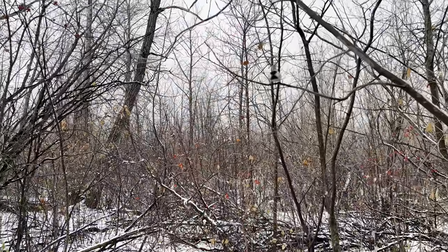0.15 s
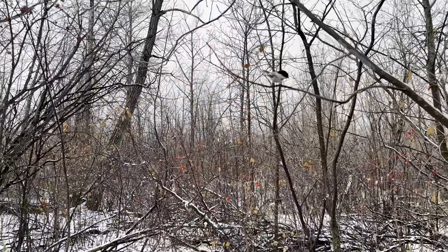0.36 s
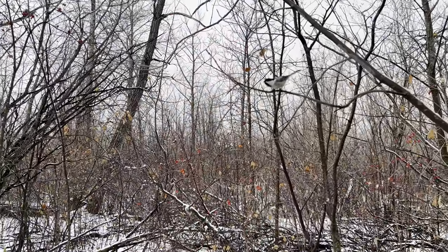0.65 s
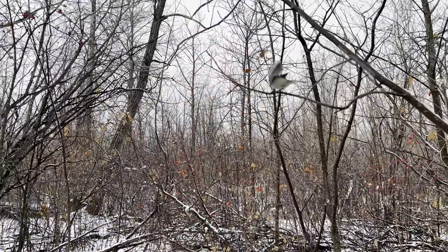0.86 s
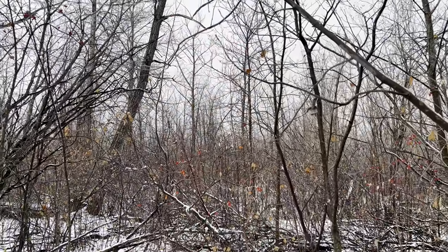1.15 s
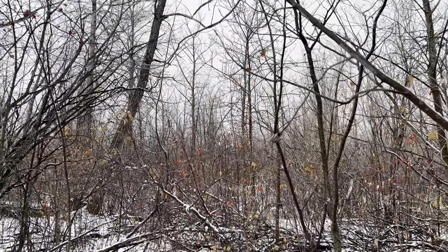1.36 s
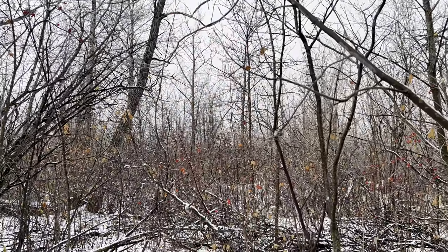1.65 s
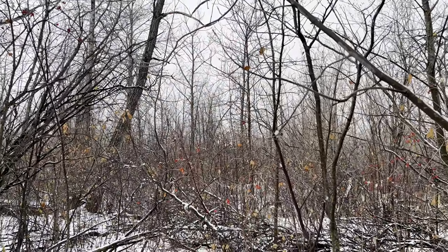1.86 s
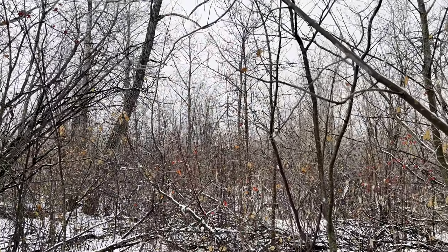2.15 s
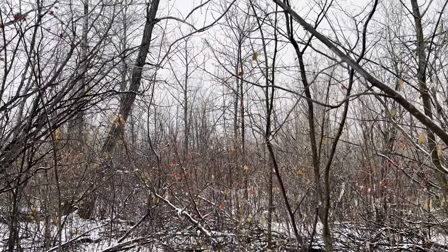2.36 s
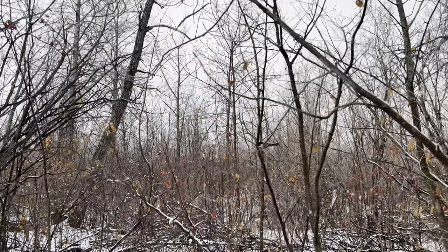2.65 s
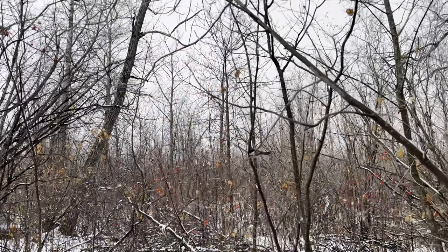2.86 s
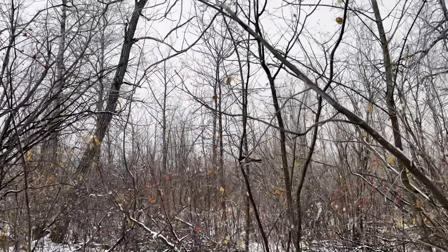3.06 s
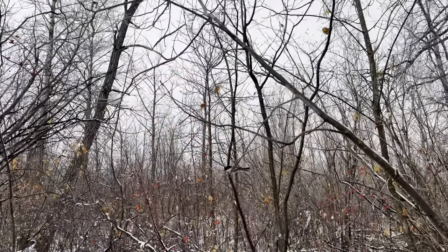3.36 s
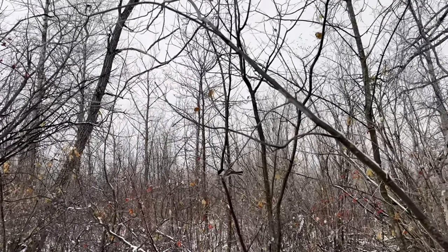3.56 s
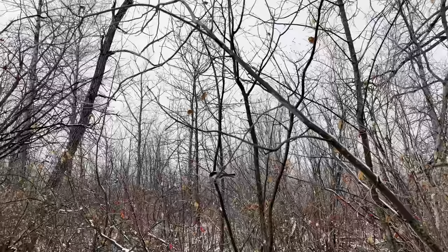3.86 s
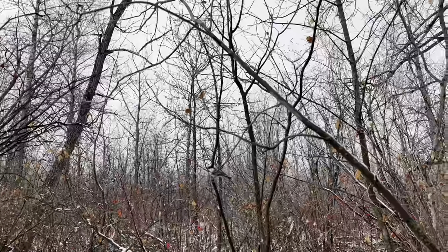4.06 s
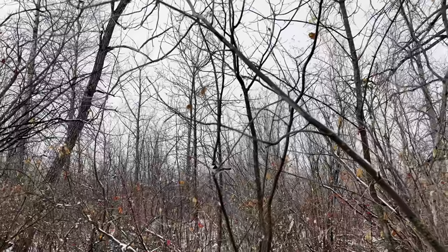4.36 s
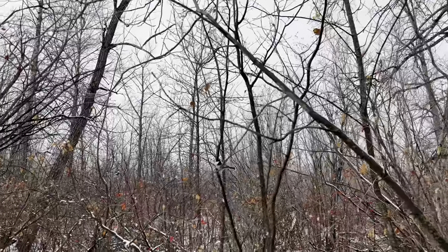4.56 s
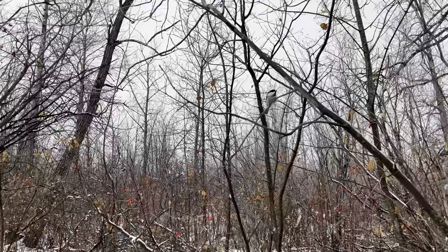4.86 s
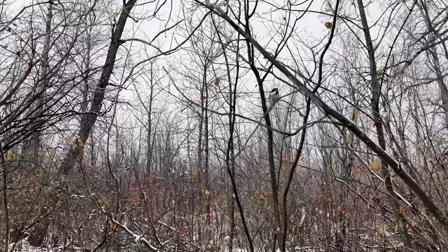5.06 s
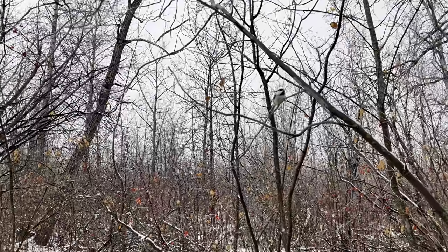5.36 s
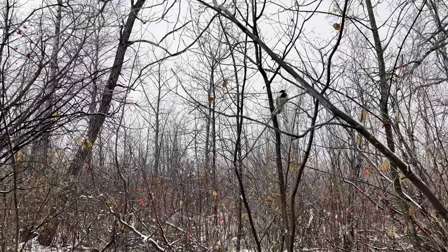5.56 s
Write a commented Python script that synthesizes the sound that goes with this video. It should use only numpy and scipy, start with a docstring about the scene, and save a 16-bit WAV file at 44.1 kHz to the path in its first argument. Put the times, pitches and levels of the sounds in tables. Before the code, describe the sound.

A chickadee whistles two clear notes, then gives two buzzy chick-a-dee calls with wing flutters in a quiet, snowy wood.

```python
"""A snowy wood with chickadees, heard by a hand-held camera with two microphone ports. One bird whistles two
clear notes, each a nearly pure tone from a single membrane. Two chick-a-dee calls follow, made by two membranes
that blend into sum and difference tones. Faint calls answer through the trees. Wings push puffs of air and
swish, twigs crack, a finger slides on the camera, a sleeve rustles and the air of the wood stirs faintly: all
are shaped noise, as is the low distant hum."""
import sys
import numpy as np
from scipy import signal
from scipy.fft import rfft, irfft
from scipy.io import wavfile
from scipy.ndimage import uniform_filter1d

SR = 44100
rng = np.random.default_rng(int(sys.argv[2]) if len(sys.argv) > 2 else 0)


def materialize(psi):
    """Save the field psi as 16-bit PCM at rate SR to the path in sys.argv[1].

    A 1-D psi becomes a single channel; in a 2-D psi each row is a channel.
    """
    bounded = np.clip(np.atleast_2d(psi).T, -1, 1)
    quanta = np.round(bounded * 32767).astype(np.int16)
    wavfile.write(sys.argv[1], SR, quanta)


N = 250929
TIME = np.arange(N) / SR

# whistled notes, near and far:
# (start [s], end [s], pitch [Hz], early lift of the pitch [Hz], level before distance [dB])
WHISTLES = [(-0.04, 0.157, 3250, 113, -45), (0.147, 0.361, 3253, -0.5, -43), (3.73, 3.9, 3290, 100, -82.5),
            (3.991, 4.125, 3320, 0, -77), (4.227, 4.333, 3324, -1, -75)]
LIFT_AT_S, LIFT_WIDTH_S, LIFT_DB_PER_HZ = 0.0984, 0.044, 0.0585  # a push of breath lifts pitch and level
DROOP_HZ, DROOP_S = 110, .014  # the pitch sinks as the note ends
WHISTLE_ATTACK_S, WHISTLE_RELEASE_S = .034, .012
WHISTLE_PAN_DB = -6.5  # left minus right

# high "chick" notes, near and far: (start [s], time the pitch plunges [s], foot of the climb [Hz],
# top of the climb [Hz], upper voice above the lower at the top [Hz], early level before distance [dB],
# late level before distance [dB], upper voice [dB], left minus right [dB])
CHICK_NOTES = [(0.678, 0.716, 6450, 7460, 1290, -61, -86, -15.5, 8),
               (1.412, 1.467, 7400, 7900, 2200, -36, -30, -7, -2),
               (1.479, 1.52, 7640, 8240, 2556, -29, -30.5, 0.5, 0),
               (1.519, 1.564, 6260, 7410, 2220, -35.5, -26, -0.5, 4.5),
               (1.586, 1.616, 6540, 7760, 2510, -28.5, -40.5, -7.5, -0.5),
               (1.624, 1.662, 5890, 7410, 2217, -32, -23, 0, 2),
               (1.691, 1.716, 5970, 7460, 2470, -27.5, -27.5, -12, -0.5),
               (1.72, 1.763, 5870, 7096, 2165, -38.5, -24.5, -3.5, 1),
               (1.8, 1.838, 5730, 7245, 2260, -25.5, -29, -16, 3.5),
               (3.242, 3.292, 6970, 7250, 1900, -72.5, -86, -6, 5.5),
               (3.414, 3.445, 6520, 7000, 1710, -64.5, -70, -13, 10.5),
               (3.574, 3.619, 5600, 6950, 1684, -60.5, -77, -23.5, 12.5),
               (3.638, 3.666, 5890, 6690, 1690, -61, -80.5, -14.5, 10.5),
               (5.133, 5.181, 6480, 7360, 1020, -46.5, -43.5, -10, 9),
               (5.179, 5.235, 7050, 7850, 2500, -33, -37, -12, 3),
               (5.343, 5.386, 7100, 8150, 2300, -32, -27, -9, 0),
               (5.461, 5.5, 6580, 7660, 2270, -23, -34, -6, -5.5)]
# harsh arched notes: (start [s], crest [s], end [s], lower voice at the crest [Hz],
# upper voice at the crest [Hz], share of the upper pitch lost at the ends [0-1], level at the crest [dB])
ARCH_NOTES = [(1.839, 1.849, 1.874, 3830, 4650, .38, -34), (1.857, 1.862, 1.88, 3800, 4900, .2, -40),
              (1.867, 1.873, 1.892, 4100, 4900, .18, -43), (1.904, 1.92, 1.941, 4233, 5330, .26, -36.5),
              (1.937, 1.944, 1.972, 4350, 5066, .13, -43), (5.569, 5.588, 5.623, 5150, 7200, .5, -33)]
# buzzy "dee" notes: (start [s], crest [s], end [s], lower voice [Hz], upper voice [Hz], sag at the ends [Hz],
# depth of the tremor [Hz], level at the crest [dB], fade [dB/s], roughness at the crest [0-1],
# left minus right [dB])
DEE_NOTES = [(1.822, 1.846, 1.897, 1747, 2090, 100, 30, -43, 0, .6, 0),
             (1.892, 1.943, 2.079, 1674, 2104, 11, 35, -38, 40, 0.56, -1.5),
             (2.131, 2.221, 2.309, 1723, 2174, 213, 13, -43, -7, 0.28, .5),
             (2.365, 2.439, 2.543, 1692, 2137, 180, 6.1, -42, -1, 0.11, -.5),
             (2.607, 2.655, 2.767, 1647, 2087, 130, 28, -43, 36, 0.44, -1),
             (5.647, 5.714, 5.82, 1680, 2170, 213, 6.6, -39.5, 3, 0.23, -2.5)]
TREMOR_PER_S = 18  # the pitch of a dee wobbles at this rate
DEE_ENDS_DB, DEE_ENDS_ROUGH = -5, 0.31  # a dee is softer and rougher away from its crest
DEE_ATTACK_S, DEE_RELEASE_S = 0.0077, 0.0095

# sum and difference tones of the two voices: (multiple of the lower pitch [1], multiple of the upper pitch [1])
DEE_MIX = [(1, 0), (0, 1), (-1, 2), (3, -1), (2, 0), (1, 1), (0, 2), (-1, 3), (4, -1), (3, 0), (2, 1),
           (1, 2), (5, -1), (4, 0), (3, 1), (0, 4), (3, 2)]
CHICK_MIX = [(1, 0), (0, 1), (-1, 1), (2, -1), (-1, 2), (2, 0)]
ARCH_MIX = [(1, 0), (0, 1), (-1, 1), (2, -1), (1, 1), (2, 0)]
# strength of each of those tones, in the same order: (level [dB])
DEE_MIX_DB = [-25, -17, -22.5, -17, -7, -4.5, -1.5, -14.5, -13.5, -7.5, -20.5, -12.5, -15.5, -21, -23.5,
              -28.5, -39]
CHICK_MIX_DB = [0, 0.5, -39, -28, -24.5, -23.5]
ARCH_MIX_DB = [0, 3.5, -22, -23.5, -9.5, -20.5]

# colour of the air hiss in chick and arched notes: (frequency [Hz], level [dB])
CHICK_AIR = [(1500, -30.5), (3000, -10), (6500, -1.5), (9000, -0.5), (11500, -6), (14000, -5.5),
             (16000, -6)]
# colour of the air through the throat in dee notes: (frequency [Hz], level [dB])
RASP = [(1000, -23.5), (1900, -10), (2700, -11), (3900, 3.5), (5200, -14.5), (7000, -12.5), (8000, -29.5),
        (13000, -30.5), (16000, -37)]
# a small beak radiates low tones poorly: (frequency [Hz], level [dB])
BEAK = [(900, -32), (1800, -6), (2700, -4), (3600, -0.5), (16000, 0)]

FAR_BELOW_DB = -55  # whistles and chicks no louder than this are far away
# near trunks throw the calls back: (delay to the left port [ms], delay to the right port [ms], level [dB])
ECHOES = [(3.3, 3.6, -17.5), (5.9, 4.1, -14.5), (9.4, 10.3, -13)]
# the left port leads the right: (frequency [Hz], lead [rad])
PORT_PHASE = [(100, .03), (1000, .3), (3300, 0.99), (7300, 2.346), (10500, 2.85), (12300, 5.3),
              (16000, 5.9)]

# short flights: (first wing beat [s], last wing beat [s], air push halfway [dB], its change over the flight [dB],
# feather swish halfway [dB], its change over the flight [dB])
FLIGHTS = [(1.026, 1.088, -53, 7, -56.5, -1), (1.234, 1.265, -57, -1, -57.5, -2),
           (2.28, 2.315, -54.5, -13, -57.5, -5), (4.597, 4.879, -50.5, -4, -58, 1),
           (5.174, 5.212, -58, 2, -83, 0)]
WINGBEAT_S = .04  # approximate: a whole number of gaps must fill each flight
PUSH_S, SWISH_RISE_S, SWISH_DECAY_S = .012, .0015, 0.012
# colour of the air pushes: (frequency [Hz], level [dB])
PUSH = [(20, -32), (45, -5.5), (80, 7), (120, -4.5), (250, -4), (450, -17.5), (700, -51), (1500, -53)]
# colour of the feather swishes: (frequency [Hz], level [dB])
SWISH = [(200, 4.5), (450, 9.5), (850, 8.5), (1500, 1.5), (3000, -5.5), (6000, -15.5), (9000, -14.5),
         (10500, -19), (13000, -11.5), (16000, -5)]

# twig snaps and taps of claws: (time [s], level before a shared trim [dB])
TICKS = [(0.5208, -70.5), (0.9128, -67), (0.9597, -59.5), (1.2115, -58.5), (1.3478, -60), (3.0214, -60),
         (3.2352, -58.5), (3.609, -63), (4.1344, -54.5), (4.5553, -60.5), (4.6149, -61)]
# their colour: (frequency [Hz], level [dB])
TICK_COLOUR = [(300, -8), (2000, 1), (6000, 3.5), (9000, 6), (11000, -14.5), (13500, 0), (16000, 2)]

# strokes of a finger on the camera:
# (reaches full strength [s], lets go [s], rise [s], fade [dB/s], level [dB])
SLIDES = [(2.68, 2.7, 0.051, 35.5, -58.5), (4.05, 4.45, 0.064, 110, -70.5), (4.64, 4.8, 0.088, 78.5, -71)]
# movements of a sleeve: (reaches full strength [s], lets go [s], rise [s], fade [dB/s], level [dB])
RUSTLES = [(.58, .62, 0.031, 84, -71), (1.04, 1.4, 0.23, 2.5, -73), (2.73, 2.75, .07, 72.5, -64),
           (3.92, 4.18, 0.052, 19, -68), (4.65, 4.72, 0.089, 56.5, -69.5)]
WOOD_AIR_DB = -80  # steady faint air of the wood and its leaves
# colour of the finger: (frequency [Hz], level [dB])
SLIDE = [(1470, -35.5), (2500, -12), (3320, -2.5), (4290, -3.5), (6480, -2), (7530, -9), (8550, 0.5),
         (10800, -18), (13700, -43), (15000, -24)]
# colour of the sleeve: (frequency [Hz], level [dB])
RUSTLE = [(300, -16), (800, 4), (1300, -2.5), (2200, -4.5), (3200, -13), (8000, -17.5), (10700, -24),
          (13000, -20.5), (16000, -39)]

# colour of the low murmur: (frequency [Hz], level [dB])
HUM = [(15, -33), (30, -2.5), (60, 3.5), (140, 0.5), (260, 0.5), (420, -3.5), (600, -13), (800, -9.5),
       (1400, -29.5), (2500, -36.5), (6500, -32), (10000, -42.5), (14000, -48.5), (16000, -47.5)]
# slow course of the murmur, before its small swells: (time [s], level [dB])
HUM_DB = [(0, -70.5), (.4, -71.5), (.9, -64.5), (2.6, -61.5), (3.2, -68.5), (3.9, -60.5), (5.03, -68.5),
          (5.69, -65.5)]
# likeness of left and right in hum, swish and sleeve: (frequency [Hz], likeness [-1 to 1])
HUM_LIKENESS = [(30, 0.48), (250, 0.76), (600, 0.009), (1500, 0.015), (4000, 0), (16000, 0.092)]

# tone of the microphone: (frequency [Hz], level [dB])
MICROPHONE = [(20, -3), (10000, 1), (10600, -16.5), (11000, 1.5), (11700, 3.5), (12300, 6), (14800, -3),
              (16000, -11)]
EDGE_HZ = 15700  # upper limit of the band


def birds():
    """Near notes arrive mostly direct, with echoes and a little haze; far ones carry far more haze."""
    song, near, far = np.zeros((3, 2, N))
    for row in WHISTLES:
        level_db = row[4]
        add(song if level_db > FAR_BELOW_DB else far, *whistle(row), pan_db=WHISTLE_PAN_DB)
    for row in CHICK_NOTES:
        early_db = row[5]
        add(near if early_db > FAR_BELOW_DB else far, *chick(row))
    for row in ARCH_NOTES:
        add(near, *arch(row))
    for row in DEE_NOTES:
        add(near, *dee(row))
    close_sound = ports(near + song)
    close_haze = woods(near, near_db=-13, far_db=-23) + woods(song, near_db=-31.0, far_db=-26)
    far_sound = gain_of(-2.5) * far + woods(far, near_db=-1.5, far_db=-3.5)
    return close_sound + close_haze + far_sound


def whistle(row, overtones_db=(0, -29, -31, -42), flutter_db=1.0, jitter=0.0022):
    """One membrane alone: a nearly pure tone that may lift early on and droops at its end."""
    start, end, pitch_hz, lift_hz, db = row
    t = np.arange(0, end - start, 1 / SR)
    lift = lift_hz * np.exp(-((t - LIFT_AT_S) / LIFT_WIDTH_S) ** 2)
    hz = pitch_hz + lift - DROOP_HZ * np.exp((t - t[-1]) / DROOP_S)
    phase = phase_of(hz * (1 + jitter * wander(len(t), hz=200)))
    tone = evened(sum(gain_of(d) * np.sin((k + 1) * phase) for k, d in enumerate(overtones_db)))
    level = gain_of(db + LIFT_DB_PER_HZ * lift + flutter_db * wander(len(t), hz=50.3))
    return start, tone * level * gate(t, WHISTLE_ATTACK_S, WHISTLE_RELEASE_S)


def chick(row, scoop_s=0.002205, bottom_hz=3100, release_s=0.017, upper_climb=0.8, swell_db=4, air_db=-23):
    """The pitch scoops up, climbs ever more slowly, then plunges as the membranes slacken."""
    start, plunge, foot_hz, top_hz, gap_hz, early_db, late_db, upper_db, pan_db = row
    climb_s = plunge - start
    t = np.arange(0, climb_s + release_s, 1 / SR)
    along = np.minimum(t / climb_s, 1)
    after = np.maximum(t - climb_s, 0)
    scoop_hz = .22 * foot_hz * np.exp(-t / scoop_s)
    sag_hz = (top_hz - foot_hz) * (1 - along) ** 1.8 + scoop_hz
    tension = 1 / (1 + (after / .0045) ** 3)
    slack = 1 - tension
    # the upper voice climbs less, so the difference tone sinks
    lower = bottom_hz + (top_hz - sag_hz - bottom_hz) * tension
    upper = bottom_hz + (top_hz + gap_hz - upper_climb * sag_hz - bottom_hz) * tension
    voice = syrinx(lower, upper, CHICK_MIX, CHICK_MIX_DB, jitter=.002, jitter_hz=700, upper_db=upper_db)
    # air hisses past the membranes, most as they let go
    air = breath(len(t), CHICK_AIR) * gain_of(air_db) * (along + 4 * slack)
    db = early_db + (late_db - early_db) * along + swell_db * (np.sin(np.pi * along) - .5)
    db = db - 32 * slack ** 1.6
    attack = 1 - np.exp(-(t / .005) ** 2)
    return start, (voice + air) * gain_of(db) * attack * signal.windows.tukey(len(t), .08), pan_db


def arch(row, lower_falls=1.3, ends_db=-7, air_db=-17):
    """Both voices rise and fall together, the lower by a larger share, with a hiss of air."""
    start, crest, end, lower_hz, upper_hz, fall, db = row
    t = np.arange(start, end, 1 / SR)
    away = np.where(t < crest, (crest - t) / (crest - start), (t - crest) / (end - crest))
    sag = fall * abs(away) ** 2.2
    lower = lower_hz * (1 - lower_falls * sag)
    upper = upper_hz * (1 - sag)
    voice = syrinx(lower, upper, ARCH_MIX, ARCH_MIX_DB, jitter=.006, jitter_hz=700)
    air = breath(len(t), CHICK_AIR) * gain_of(air_db) * fall  # deeper arches hiss more
    level = gain_of(db + ends_db * away ** 2) * signal.windows.tukey(len(t), .15)
    return start, coloured((voice + air) * level, BEAK)[:len(t)]


def dee(row, air_db=-6, jitter=.04):
    """Two low voices bend together; the throat favours mixtures near 4 kHz, and rough notes carry more air."""
    start, crest, end, lower_hz, upper_hz, sag_hz, tremor_hz, db, fade, rough, pan_db = row
    t = np.arange(start, end, 1 / SR) - crest
    away = np.where(t < 0, t / (start - crest), t / (end - crest)) ** 2
    bend = tremor_hz * np.cos(2 * np.pi * TREMOR_PER_S * t) - sag_hz * away
    rough = np.clip(rough + DEE_ENDS_ROUGH * away ** 2, 0, 1)
    voice = syrinx(lower_hz + bend, upper_hz + bend, DEE_MIX, DEE_MIX_DB, jitter=jitter * rough, jitter_hz=448)
    air = gain_of(air_db) * np.sqrt(rough) * breath(len(t), RASP)
    level = gain_of(db + DEE_ENDS_DB * away - fade * t) * gate(t - t[0], DEE_ATTACK_S, DEE_RELEASE_S)
    return start, evened(voice + air) * level, pan_db


def syrinx(lower_hz, upper_hz, mix, mix_db, jitter, jitter_hz, upper_db=0):
    """Two membranes vibrate at their own unsteady pitches and modulate each other."""
    lower = phase_of(lower_hz * (1 + jitter * wander(len(lower_hz), jitter_hz)))
    upper = phase_of(upper_hz * (1 + jitter * wander(len(upper_hz), jitter_hz)))
    voice = 0
    for (m, n), db in zip(mix, mix_db):
        tone = np.sin(m * lower + n * upper + 2 * np.pi * rng.random())
        voice = voice + gain_of(db + abs(n) * upper_db) * tone
    return evened(voice)


def breath(count, colour):
    """Air rushing through the throat: coloured noise of even size."""
    return evened(coloured(rng.standard_normal(count), colour)[:count])


def ports(x):
    """Direct sound reaches the left port first; single echoes follow."""
    hz = np.fft.rfftfreq(2 * N, 1 / SR)
    paths = np.exp(-1j * read(PORT_PHASE, hz) * np.array([[0], [1]]))
    for left_ms, right_ms, db in ECHOES:
        delay_s = np.array([[left_ms], [right_ms]]) / 1000
        paths = paths + gain_of(db) * np.exp(-2j * np.pi * hz * delay_s)
    return irfft(rfft(x, 2 * N) * paths)[:, :N]


def woods(x, near_db, far_db, far_t60=0.52):
    """Twigs close by scatter a short haze; the deep wood gives a faint longer tail."""
    t, tail = TIME[:SR], 0
    for db, t60 in ((near_db, .12), (far_db, far_t60)):  # t60: seconds to fade by 60 dB
        taps = rng.standard_normal((2, SR)) * gain_of(-60 * t / t60) * (1 - np.exp(-t / 0.0059))
        tail = tail + gain_of(db) * taps / np.linalg.norm(taps[0])
    return signal.fftconvolve(x, tail, axes=1)[:, :N]


def wings():
    """Evenly spaced wing beats: each downstroke pushes a puff of air and makes the feathers swish."""
    push, swish = np.zeros((2, 2, N))
    t = TIME[:SR // 8]
    puff = t / PUSH_S * np.exp(1 - t / PUSH_S)
    flick = (1 - np.exp(-t / SWISH_RISE_S)) * np.exp(-t / SWISH_DECAY_S)
    flick = flick / flick.max()
    for first, last, push_db, push_change_db, swish_db, swish_change_db in FLIGHTS:
        beats = round((last - first) / WINGBEAT_S) + 1
        for along in np.linspace(0, 1, beats):
            s = first + along * (last - first)
            add(push, s - PUSH_S / 2, gain_of(push_db + push_change_db * (along - .5)) * puff)
            add(swish, s - SWISH_RISE_S, gain_of(swish_db + swish_change_db * (along - .5)) * flick)
    pushed_air = push * noise(PUSH, [(30, 0.92), (700, 0.96)], patchy_db=0.5)  # nearly alike left and right
    feathers = swish * noise(SWISH, HUM_LIKENESS, patchy_db=3)
    return pushed_air + feathers


def twigs(ring_s=0.0017, trim_db=-1):
    """Tiny cracks: bursts of noise that die at once, with a haze from the wood."""
    cracks, t = np.zeros((2, N)), TIME[:SR // 40]
    for s, db in TICKS:
        add(cracks, s, gain_of(db + trim_db) * np.exp(-t / ring_s) * rng.standard_normal(len(t)))
    cracks = coloured(cracks, TICK_COLOUR)
    return cracks + woods(cracks, near_db=-1, far_db=-17.0)


def handling(slide_pan_db=12, grain_db=1.0, crinkle_db=1.5):
    """Rubbing noise: a finger slides beside the left port and a sleeve rustles, over the steady faint air of
    the wood and its leaves."""
    slide = noise(SLIDE, [(100, 0.0035), (16000, 0.0098)], patchy_db=2.0)
    slide *= evened(gain_of([[slide_pan_db], [0]]))
    slide *= strokes(SLIDES) * gain_of(grain_db * wander(N, hz=80))
    sleeve = noise(RUSTLE, HUM_LIKENESS, patchy_db=0)
    sleeve *= np.hypot(strokes(RUSTLES), gain_of(WOOD_AIR_DB))
    return slide + sleeve * gain_of(crinkle_db * wander(N, hz=39.9))


def strokes(rows):
    """Strength of rubbing over time: each stroke swells, holds and dies away."""
    power = 0
    for on, off, rise, fade, db in rows:
        swell = 1 / (1 + (np.maximum(on - TIME, 0) / rise) ** 4)
        dying = gain_of(db - abs(fade) * np.maximum(TIME - off, 0))
        power = power + (dying * swell) ** 2
    return np.sqrt(power)


def hum(swell_db=2.0):
    """Low murmur of distant roads and air: noise that swells gently, a touch louder on the right."""
    s, db = np.transpose(HUM_DB)
    level = gain_of(np.interp(TIME, s, db) + swell_db * wander(N, hz=12))
    return noise(HUM, HUM_LIKENESS, patchy_db=1.5) * level * gain_of([[-.6], [.6]])


def noise(colour, likeness, patchy_db):
    """Stereo noise whose spectrum has drifting louder and softer patches."""
    hz = np.fft.rfftfreq(2048, 1 / SR)
    a, b, c, d, patches = rng.standard_normal((N // 512 + 5, len(hz), 5)).T
    patches = uniform_filter1d(patches, size=24, axis=0)  # smooth over frequency
    patches = evened(uniform_filter1d(patches, size=6, axis=1))  # smooth over time
    same = np.clip(read(likeness, hz), -1, 1)[:, None]
    left = a + 1j * b
    right = same * left + np.sqrt(1 - same ** 2) * (c + 1j * d)
    z = np.array([left, right]) * gain_of(read(colour, hz)[:, None] + patchy_db * patches)
    return evened(signal.istft(z, nperseg=2048, noverlap=1536)[1][:, :N])


def coloured(x, colour):
    """Filters a sound so that each frequency gets the level in the colour table."""
    hz = np.fft.rfftfreq(2 * N, 1 / SR)
    return irfft(rfft(x, 2 * N) * gain_of(read(colour, hz)))[..., :N]


def wander(count, hz):
    """Smooth chance of about size 1 that mostly moves slower than hz."""
    padded = count + SR // 10
    f = np.fft.rfftfreq(padded, 1 / SR)
    return evened(irfft(rfft(rng.standard_normal(padded)) / (1 + (f / hz) ** 2)))[:count]


def gate(t, attack_s, release_s):
    """Soft attack, hold, soft release."""
    return (1 - np.exp(-(t / attack_s) ** 2)) * (1 - np.exp(-((t[-1] - t) / release_s) ** 2))


def phase_of(hz):
    """Adds up a changing pitch into the angle of its vibration."""
    return 2 * np.pi * np.cumsum(hz) / SR


def add(mix, s, sound, pan_db=0):
    """Places a sound in time and between the two ports."""
    at = round(s * SR)
    sound = sound[max(-at, 0):]  # drop what falls before time zero
    part = mix[:, max(at, 0):][:, :len(sound)]
    part += evened(gain_of([[pan_db / 2], [-pan_db / 2]])) * sound[:part.shape[1]]


def read(points, hz):
    """Reads a table at any frequency, along a logarithmic axis."""
    f, value = np.transpose(points)
    return np.interp(np.log(hz + 1), np.log(f + 1), value)


def gain_of(db):
    """Turns decibels into a factor of amplitude."""
    return 10 ** (np.asarray(db) / 20)


def evened(x):
    """Scales to an average (RMS) size of 1."""
    return x / np.sqrt(np.mean(x ** 2) + 1e-20)


def scene():
    """All sources together, from the birds to the background."""
    return birds() + wings() + twigs() + handling() + hum()


def record(dry):
    """The microphone ports dip near 10.6 kHz; then a steep filter limits the band."""
    band = signal.firwin(511, EDGE_HZ, window=("kaiser", 9), fs=SR)
    return signal.oaconvolve(coloured(dry, MICROPHONE), band[None], "same")


dry = scene()
out = record(dry)
materialize(out)
```